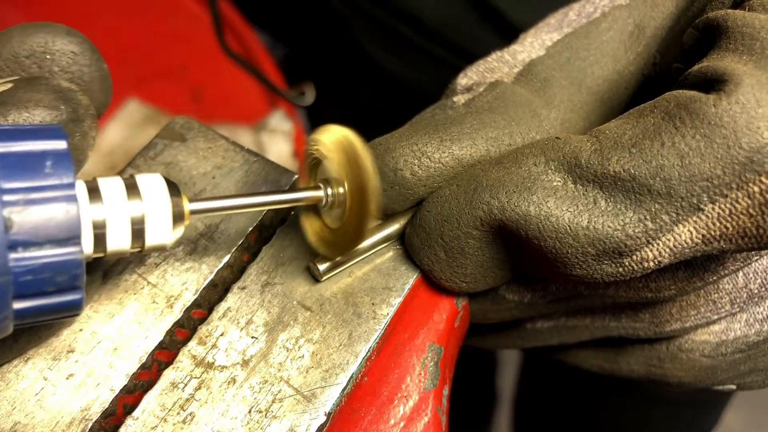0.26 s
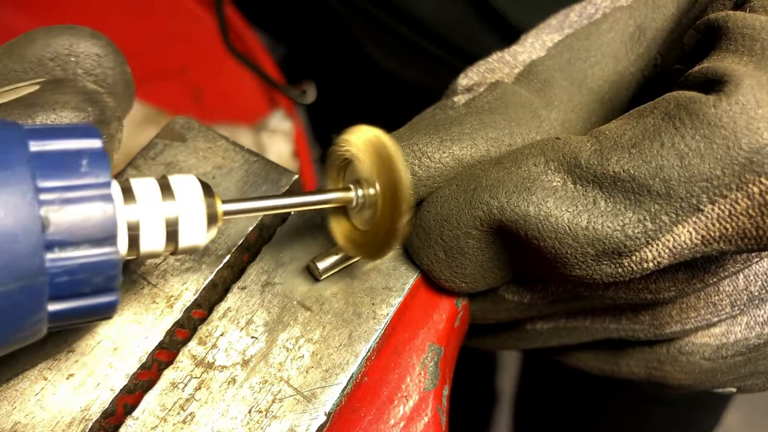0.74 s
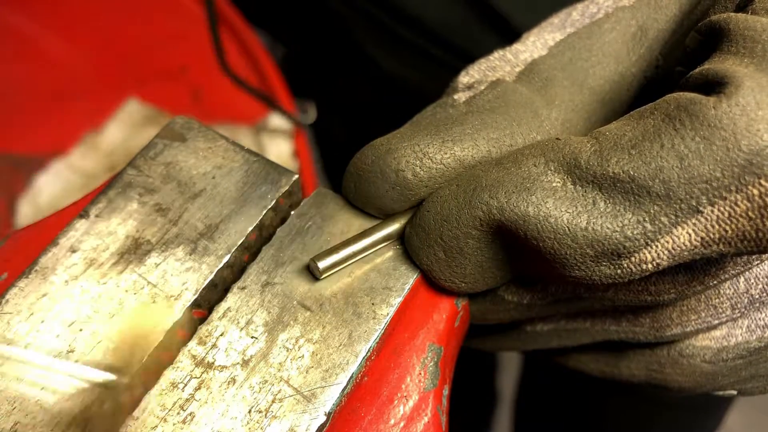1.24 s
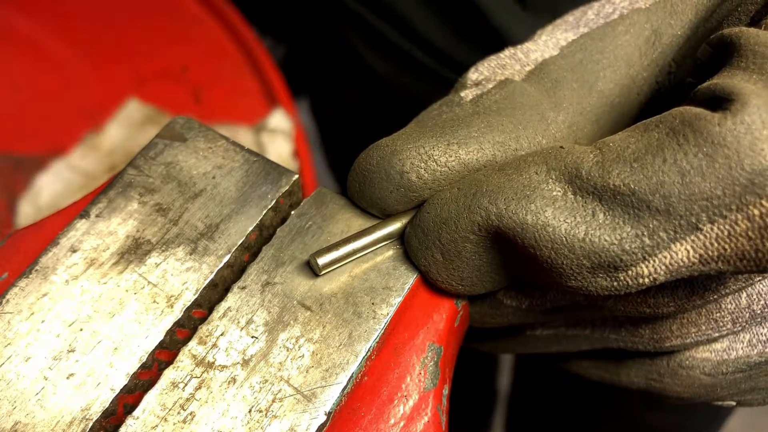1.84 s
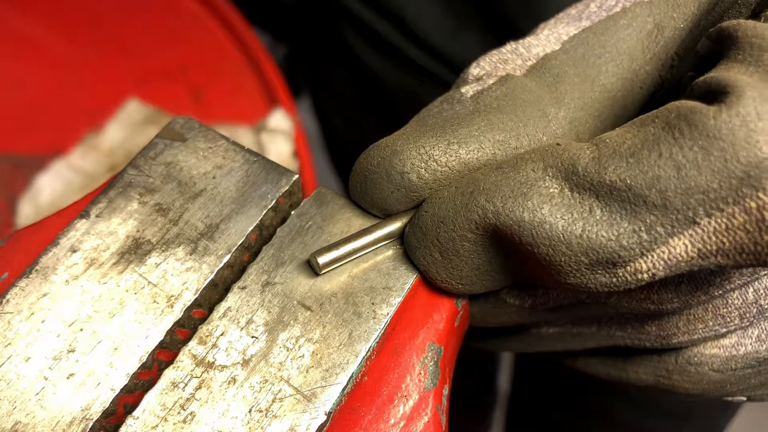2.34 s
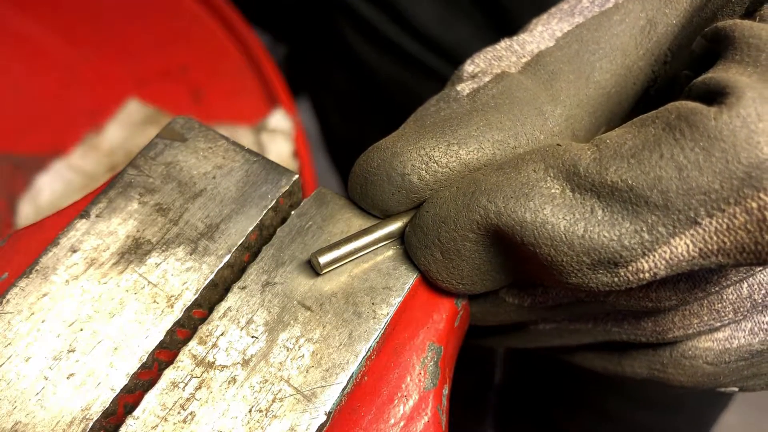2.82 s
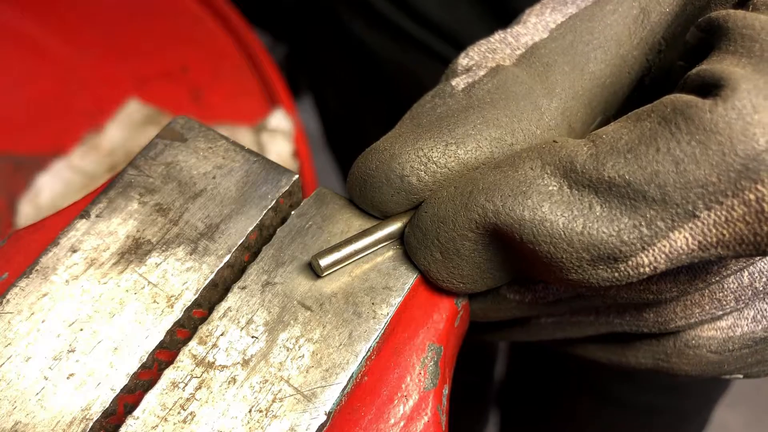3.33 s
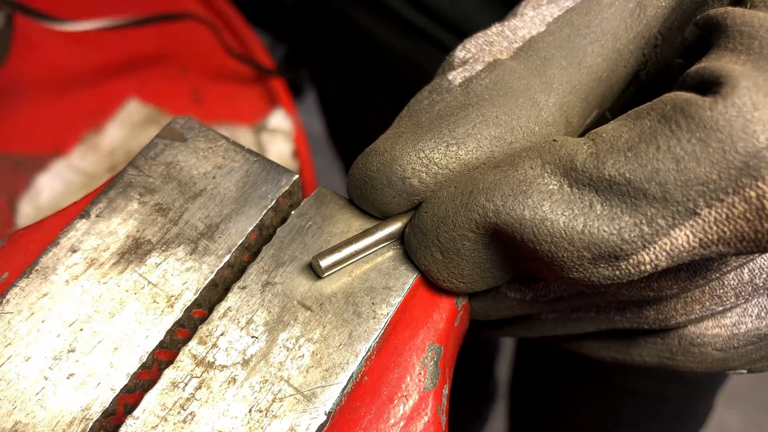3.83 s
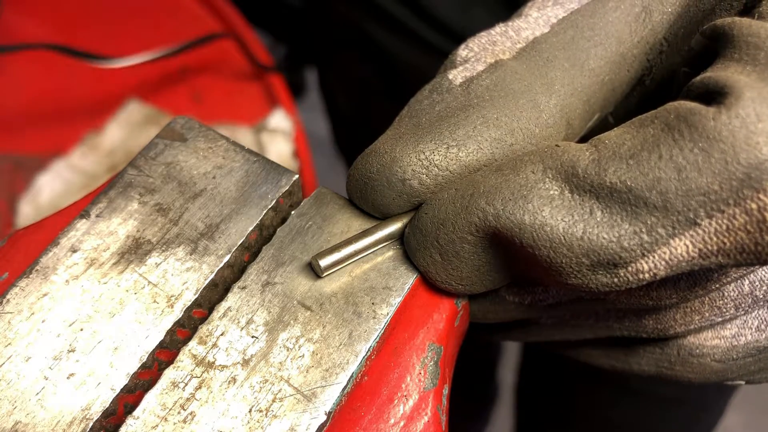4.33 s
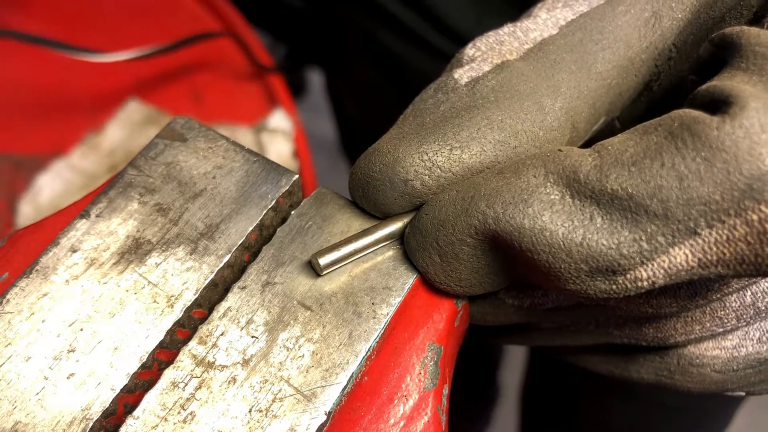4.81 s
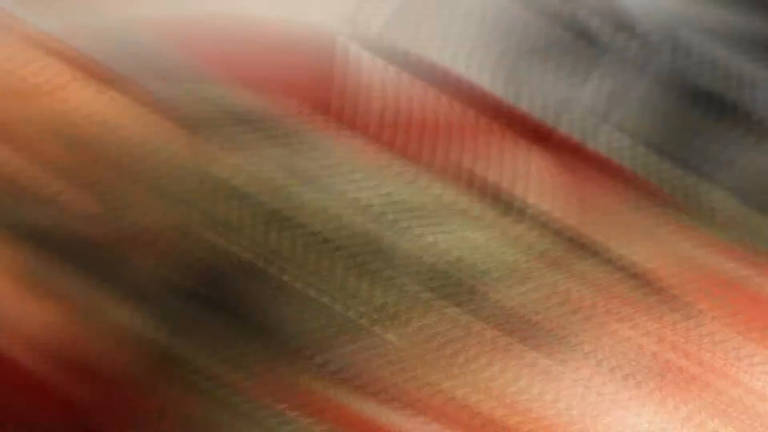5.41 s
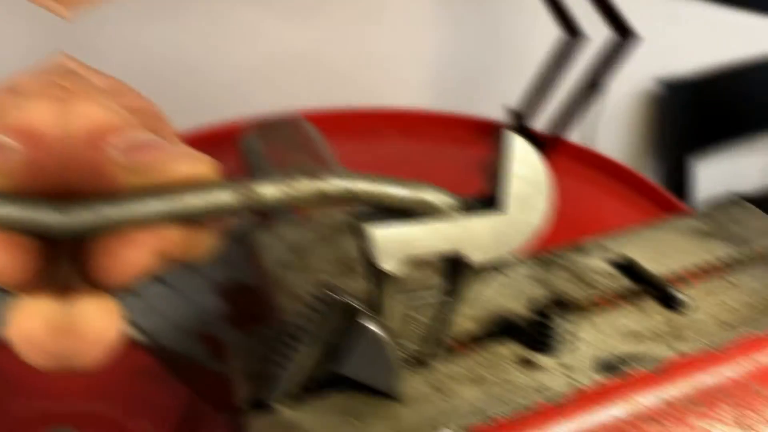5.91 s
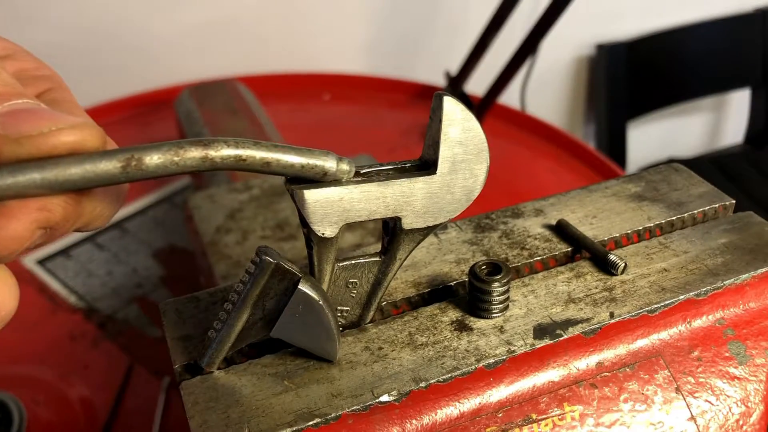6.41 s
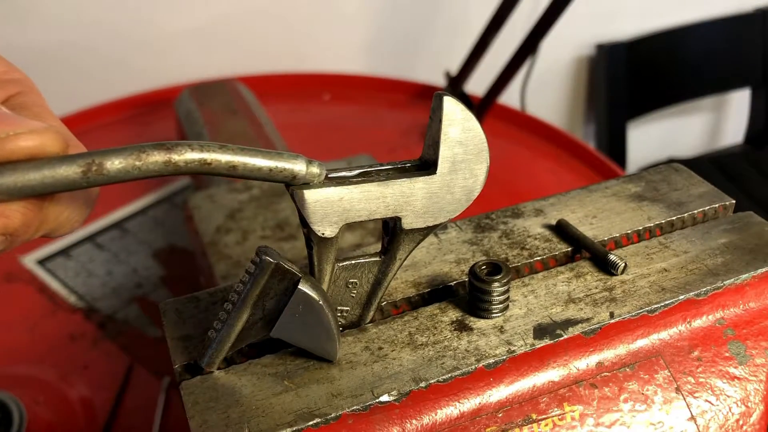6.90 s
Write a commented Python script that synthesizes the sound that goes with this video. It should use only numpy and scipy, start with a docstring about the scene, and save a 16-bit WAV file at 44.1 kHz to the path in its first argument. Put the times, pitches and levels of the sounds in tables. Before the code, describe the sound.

In a small workshop, close to the microphone, a handheld rotary tool buzzes with a rough, chattering rattle as its wire wheel brushes a steel pin. It lifts off, speeds up and hisses freely, then clicks off and winds down quickly. A hard metallic clank follows as it is laid down. Gloves rub softly and small parts click brightly, then light dry ticks sound over a faint room hum.

```python
"""A rotary tool buzzes and rattles as its wire brush works a steel pin; it lifts off, runs free and coasts down.
The housing rings with knocks from the turning shaft, under a whine, a hum and airy hiss; it is laid down with a clank.
Gloves and small parts rustle and click close by, made of patchy noise and short ringing modes.
Then light ticks sound at another bench, over a workshop hum and hiss of coloured noise."""
import sys
import numpy as np
from scipy import signal
from scipy.fft import rfft, irfft, next_fast_len
from scipy.io import wavfile
from scipy.ndimage import uniform_filter1d, map_coordinates

SR = 44100
rng = np.random.default_rng(int(sys.argv[2]) if len(sys.argv) > 2 else 0)


def log_audio(samples):
    """Write samples as a 16-bit WAV file to the path given in sys.argv[1]."""
    # one column per channel
    frames = np.atleast_2d(samples).T
    # limit to full scale, then quantise
    limited = np.clip(frames, -1, 1)
    pcm = np.round(limited * 32767).astype(np.int16)
    wavfile.write(sys.argv[1], SR, pcm)


N = 315315
T = np.arange(N) / SR

LIFT_OFF, SWITCH_OFF = 1.24, 3.165  # s
UNEVEN_ENDS = 1.17  # s, the wheel stops catching the pin

# colour of the housing: (frequency [Hz], density [dB per Hz])
HOUSING = [(150, -30), (400, -17.5), (600, -11.5), (800, 1), (1200, 2), (2000, -4.5), (2600, -9.5),
           (3200, -16.5), (4500, -25), (7000, -44.5)]
# colour of hiss, for the wires on the pin and the workshop: (frequency [Hz], density [dB per Hz])
HISS = [(590, -36), (1000, -7.5), (1040, -14.5), (2000, -5), (2380, -9), (3360, -10), (4980, -11.5),
        (9180, -13.5), (15800, -19)]
# brightness of a hard blow: (frequency [Hz], density [dB per Hz])
SHOCK = [(1500, -24), (2600, -11), (3900, 1), (5000, -7), (6300, -3), (9000, -13), (15800, -25)]
# modes of a handled part's body, also of the housing: (frequency [Hz], relative level [dB], t60 [s])
BODY = [(813, -13, 0.04), (1070, 7.5, 0.021), (1310, 3, 0.013), (1340, 14.5, 0.0091), (1990, -3.5, 0.017),
        (2370, 3.5, 0.018)]
# middle modes of small parts: (frequency [Hz], relative level [dB], t60 [s])
PARTS = [(2300, -3, .005), (3200, -2, .004), (4100, -1, .004), (5200, -2, .005)]
# bright steel modes: (frequency [Hz], relative level [dB], t60 [s])
STEEL = [(6270, -5.5, 0.012), (7070, 8.5, 0.013), (8110, 4.5, 0.0091), (10240, 4.5, 0.011),
         (12700, -11, 0.0045), (15000, 0.5, 0.0053)]
# strokes of gloves and parts rubbing:
# (start [s], end [s], low level [dB], high level [dB], swell from start to end [dB])
RUB = [(3.755, 3.815, -64, -77, 0), (4.199, 4.265, -73, -75, 3), (4.247, 4.483, -84, -94, -13),
       (4.489, 4.64, -85, -77, 12), (4.642, 4.891, -81.5, -82.5, 11), (4.956, 5.058, -77.5, -75, 4),
       (5.044, 5.139, -63.5, -71, -7), (5.128, 5.218, -65.5, -77, 10), (5.188, 5.323, -60, -65, 5),
       (5.297, 5.37, -66.5, -75, -1)]


def amp(db):
    """Decibels to gain."""
    return 10 ** (np.asarray(db) / 20)


def unit(x):
    """x at rms 1."""
    return x / np.sqrt(np.mean(x ** 2) + 1e-20)


def even(x):
    """x held near rms 1 over about 50 ms."""
    power = uniform_filter1d(uniform_filter1d(x ** 2, size=SR // 20), size=SR // 20)
    return x / np.sqrt(np.abs(power) + 1e-12)


def noise():
    """White noise of rms about 1."""
    return rng.standard_normal(N)


def along(points, hz):
    """(frequency, value) points read on a log frequency axis."""
    f, v = np.transpose(points)
    return np.interp(np.log(hz + 1), np.log(f + 1), v)


def curves(rows):
    """One value per sample for each column after the time."""
    s, *cols = np.transpose(rows)
    return [np.interp(T, s, c) for c in cols]


def during(start, end, fade):
    """1 between two times, with ramps of fade seconds just inside them."""
    return np.clip(np.minimum(T - start, end - T) / fade, 0, 1)


def stage(levels):
    """First value while brushing, second after lift-off."""
    return levels[0] + (levels[1] - levels[0]) * during(LIFT_OFF, 8, 0.19)


def wobble(rate):
    """A smooth random curve with rate knots a second."""
    return map_coordinates(rng.standard_normal(int(N * rate / SR) + 4), [T * rate])


def filtered(x, response):
    """x times a response of frequency."""
    m = next_fast_len(N + SR // 4)
    return irfft(rfft(x, m) * response(np.fft.rfftfreq(m, 1 / SR)), m)[:N]


def coloured(x, spectrum):
    """x through a (frequency, dB) spectrum, at rms 1."""
    return unit(filtered(x, lambda hz: amp(along(spectrum, hz))))


def resonant(x, peaks):
    """x through parallel resonances of alternating sign, at rms 1."""
    def response(f):
        return sum((-1) ** k * amp(db) * 1j * f * width / (hz * hz - f * f + 1j * f * width)
                   for k, (hz, width, db) in enumerate(peaks))
    return unit(filtered(x, response))


def patchy(x, db, size):
    """x with random patches of gain, about 500 Hz by size steps of 3 ms."""
    z = signal.stft(x, nperseg=256)[2]
    field = uniform_filter1d(rng.standard_normal(z.shape), size=3, axis=0)
    field = uniform_filter1d(field, size=size, axis=1)
    return signal.istft(z * amp(db * unit(field)), nperseg=256)[1][:N]


def ring(modes, crack, spread=.045):
    """One blow of peak 1: decaying modes at new strengths and pitches, plus a short bright crack."""
    t = np.arange(SR // 3) / SR
    x = sum(amp(db + rng.normal(0, 3) - 60 * t / t60) * np.sin(2 * np.pi * hz * rng.normal(1, spread) * t)
            for hz, db, t60 in modes)
    x = x + crack * amp(-60 * t / 0.017) * np.diff(rng.standard_normal(len(t) + 1))
    x = x * (1 - np.exp(-t / 0.00074))  # soft attack
    return x / np.abs(x).max()


def burst(seconds, t60):
    """White noise dying away exponentially."""
    t = np.arange(int(SR * seconds)) / SR
    return amp(-60 * t / t60) * rng.standard_normal(len(t))


def add(track, s, x):
    """Mix x into the track at s seconds."""
    track[round(s * SR):][:len(x)] += x


def shaft():
    """Turns per second: driven, then slowed by air drag and bearing friction."""
    drag_s, friction = 1.23, 170  # drag time constant in s; friction in turns per s
    # shaft speed under power: (time [s], speed [turns per s])
    powered = [(0, 208), (.08, 214), (.34, 214.3), (.47, 208), (.62, 210.5), (.76, 198), (.9, 210.4),
               (1.09, 201), (1.16, 203.5), (1.41, 240), (1.52, 246.2), (1.9, 251), (2.4, 253),
               (2.51, 249.5), (2.6, 252), (2.8, 249.5), (2.94, 250.6), (3.16, 247)]
    driven, = curves(powered)
    return (driven + friction) * np.exp(-np.clip(T - SWITCH_OFF, 0, None) / drag_s) - friction


def housing(speed, turn, pulsing, uneven):
    """The shaft knocks the housing once a turn; loose bearings turn the knocks into chatter."""
    steady_play = (.18, .33)  # bearing looseness 0-1: (brushing, running free)
    smear_tight, smear_loose, smear_brushing = .2, 1.6, .7  # radians
    slide_octaves = .3
    split_hz = (1100, 1650)  # borders of the lower and upper part
    # loudness of the housing as it is moved about:
    # (time [s], level [dB], lower part over it [dB], upper part over it [dB])
    rattle_rows = [(0.0, -40, 2, -5), (0.03, -39, -6.5, -10.5), (0.13, -44.5, 0, -1),
                   (0.47, -46.5, 3.5, 1.5), (0.71, -44, 2.5, 1.5), (0.87, -47, 7, 3),
                   (1.04, -39.5, 0.5, -2), (1.1, -43.5, 7.5, -1), (1.2, -35.5, -10, -9.5),
                   (1.243, -35, -6.5, -7.5), (1.251, -50, -4.5, 2.5), (1.265, -39, -4, -9.5),
                   (1.32, -36.5, -6.5, -1.5), (1.35, -43.5, 1.5, -2.5), (1.45, -37.5, -3, 4.5),
                   (1.5, -45, 8, 8), (1.54, -43, 3.5, 7.5), (1.77, -50, 0, 6), (1.82, -47, 2, -2),
                   (1.89, -50.5, -10.5, 2), (2.03, -55, 13, 12.5), (2.07, -50, 1, 4.5), (2.37, -52, 2, 9),
                   (2.4, -50.5, 4.5, 4), (2.45, -47.5, 3.5, 10.5), (2.5, -40.5, -1, -1),
                   (2.72, -40, -6, -0.5), (2.74, -59, 4, 18.5), (2.8, -43.5, -2, -2), (2.89, -44, -8, 3.5),
                   (2.96, -40, -3, 0), (3.05, -53, -5, 9.5), (3.26, -45, -6, 9.5),
                   (3.28, -41.5, -13.5, -2.5), (3.35, -45.5, -1.5, -1.5), (3.39, -45, -10.5, -9),
                   (3.44, -66.5, 7.5, 5), (3.76, -76, 12, 12), (3.83, -65.5, -0.5, 2.5)]
    # bouts of bearing chatter: (middle [s], half length [s], change of looseness [0-1])
    bouts = [(0.15, .42, .42), (1.2, .07, -.3), (1.35, .11, .3), (1.51, .11, -.22), (1.95, .25, .3),
             (2.28, .12, -.1), (2.61, .2, .45), (2.93, .09, .4), (3.1, .08, .12), (3.2, .04, .12),
             (3.27, .03, -.08), (3.34, .08, .3), (3.44, .04, -.1), (3.72, .3, .4)]
    # a ring slides down as coasting begins: (time [s], frequency [Hz], boost [dB])
    slide_rows = [(3.17, 2420, 1), (3.2, 2450, 7.5), (3.26, 1750, 6), (3.3, 1380, 8), (3.33, 1340, 3.5)]
    rattle_db, lower_db, upper_db = curves(rattle_rows)
    slide_hz, slide_db = curves(slide_rows)
    bout_play = sum(more * during(s - half, s + half, half) for s, half, more in bouts)
    loose = np.clip(stage(steady_play) + bout_play, 0, 1)
    # the housing spreads each knock, more so as the bearings loosen or the wires drag
    smear = smear_tight + smear_loose * loose + smear_brushing * during(-1, UNEVEN_ENDS, .03)
    # play in the bearings shifts each knock in time, which blurs the high orders most
    contact = turn + .19 * loose * wobble(110)

    def order(k):
        level_db = 2.6 * wobble(18) + 2.3 * wobble(6) - 1.3 * max(k - 9, 0)
        return amp(level_db) * np.sin(k * contact + smear * wobble(8))

    def slide(k):
        return amp(slide_db * np.exp(-(np.log2(k * speed / slide_hz) / slide_octaves) ** 2))

    knocks = sum(slide(k) * order(k) for k in range(3, 20))
    # strong and weak turns alternate: lines halfway between the orders
    between = sum(order(k + .5) for k in range(2, 20))
    steady = coloured(amp(0.84 * wobble(90)) * (knocks + uneven * between), HOUSING)
    once_a_turn = np.exp(.85 * pulsing * np.cos(contact + .4 * wobble(20)))
    chatter = patchy(once_a_turn * amp(1.3 * wobble(70)) * noise(), db=3.5, size=20)
    rattle = np.cos(loose * np.pi / 2) * steady + np.sin(loose * np.pi / 2) * coloured(chatter, HOUSING)
    below, under = [filtered(rattle, lambda hz: 1 / (1 + (hz / edge) ** 12)) for edge in split_hz]
    parts = amp(lower_db) * even(below) + even(under - below) + amp(upper_db) * even(rattle - under)
    return amp(rattle_db) * parts


def whine(turn):
    """Commutator bars sing at four and eight times the shaft speed."""
    # fourth-order whine, ahead of a 7 dB cut: (time [s], level [dB])
    fourth = [(0, -62), (.3, -47), (.52, -36), (.7, -33.5), (.78, -37.5), (1.04, -36.5), (1.2, -68),
              (1.44, -48), (1.7, -54), (1.93, -74), (2.04, -49), (2.42, -43), (2.51, -47), (2.69, -68),
              (2.77, -80.5), (2.95, -42.5), (3.04, -89), (3.29, -76), (3.4, -48.5), (3.5, -69), (3.83, -66)]
    # eighth-order whine: (time [s], level [dB])
    eighth = [(.44, -71), (.5, -48), (.64, -48), (.78, -58), (.9, -52), (1.0, -64), (1.36, -57),
              (1.45, -38), (1.65, -70), (2.1, -55), (2.2, -46), (2.4, -54.5), (2.5, -66), (3.3, -61),
              (3.5, -65), (3.83, -72)]
    fourth_db = curves(fourth)[0] + 1.2 * wobble(18) - 7
    eighth_db = curves(eighth)[0] + 2.5 * wobble(18)
    return amp(fourth_db) * np.sin(4 * turn) + amp(eighth_db) * np.sin(8 * turn)


def air(turn, pulsing):
    """Fan air and wire tips hiss in bursts once a turn; two steel rings drift and flare in the hiss."""
    ring_knots, flare_db = (650, 440), (2.5, 4)  # (lower, upper): bandwidth in knots per s, flare depth
    # air hiss, ahead of a 4.5 dB cut: (time [s], level [dB])
    hiss_rows = [(0.0, -44.5), (0.16, -47.5), (0.72, -46), (0.77, -53.5), (0.99, -48.5), (1.22, -46),
                 (1.33, -39), (1.36, -48), (1.41, -37.5), (1.47, -47), (1.49, -38), (1.55, -47),
                 (1.58, -39), (1.6, -45), (1.89, -48.5), (1.95, -52.5), (2.08, -48.5), (2.46, -52),
                 (2.54, -43), (2.57, -52.5), (2.69, -47), (2.71, -59), (2.74, -48), (2.87, -52.5),
                 (3.04, -46.5), (3.16, -42.5), (3.17, -50), (3.21, -47.5), (3.38, -58.5), (3.83, -66.5)]
    # hiss resonances while brushing: (frequency [Hz], width [Hz], relative level [dB])
    brushing = [(3535, 870, -5), (5430, 590, -1.5), (7370, 490, 1), (9580, 4800, -8.5), (12600, 2200, -2.5),
                (15700, 960, -11)]
    # hiss resonances while running free: (frequency [Hz], width [Hz], relative level [dB])
    running_free = [(3770, 430, -1), (5460, 2300, 1.5), (6820, 2730, 2), (9750, 1600, -1.5),
                    (13100, 3300, -8), (15800, 780, -12.5)]
    # two steel rings in the hiss:
    # (time [s], lower level [dB], upper level [dB], lower frequency [Hz], upper frequency [Hz])
    ring_rows = [(0.0, -59, -49.5, 5940, 11000), (0.06, -59, -53, 6070, 10900),
                 (1.19, -64, -70.5, 6170, 11100), (1.34, -49, -60.5, 6470, 10960),
                 (1.43, -48, -47.5, 6310, 10870), (1.64, -50.5, -57, 6480, 11130),
                 (1.89, -63, -51, 6210, 11000), (1.92, -67, -62, 6240, 11200),
                 (2.84, -59.5, -62.5, 6260, 10900), (3.1, -67, -62, 6240, 10940),
                 (3.15, -64, -52, 6160, 10860), (3.3, -86, -74, 6350, 11100), (3.83, -88, -95, 6530, 11100)]
    broad_db, = curves(hiss_rows)
    lower_db, upper_db, lower_hz, upper_hz = curves(ring_rows)
    once_a_turn = np.exp(.55 * pulsing * np.cos(turn + .6 * wobble(20)))
    free = during(LIFT_OFF, 8, 0.047)
    broad = patchy(once_a_turn * amp(1.4 * wobble(60)) * noise(), db=2.0, size=30)
    x = amp(broad_db - 4.5) * ((1 - free) * resonant(broad, brushing) + free * resonant(broad, running_free))
    for db, hz, knots, depth_db in zip((lower_db, upper_db), (lower_hz, upper_hz), ring_knots, flare_db):
        phase = 2 * np.pi * np.cumsum(hz) / SR
        narrow = unit(once_a_turn * (wobble(knots) * np.sin(phase) + wobble(knots) * np.cos(phase)))
        x = x + amp(db) * unit(amp(depth_db * wobble(33.85))) * narrow
    return x


def motor_hum(speed, turn, uneven):
    """Once- and twice-a-turn hum; it fades as the tool is drawn away and sinks as the shaft slows."""
    level_db = stage((-45.5, -46.5))  # (brushing, running free)
    fade_db_per_s = 5  # as the tool is drawn away after lift-off
    off_db, fall_db, free_speed = -2, 34, 250  # step at switch-off; loss per halving below free_speed, turns per s
    half_order_db = -18  # line halfway between first and second order, scaled by the unevenness
    off, halvings = during(SWITCH_OFF - .03, 8, 0.049), np.log2(free_speed / speed)
    drawn_away_db = fade_db_per_s * np.clip(T - LIFT_OFF, 0, None)
    hum_db = level_db - drawn_away_db + 0.88 * wobble(8.2) + off * (off_db - fall_db * halvings)
    second = amp(-7.5 + 4.7 * wobble(12)) * np.sin(2 * turn)
    halfway = uneven * amp(half_order_db + 10.0 * wobble(20.0)) * np.sin(3 * turn / 2)
    return amp(hum_db) * (np.sin(turn) + second + halfway)


def pin_shake():
    """The wires shake the pin and vise while they touch: noise in two low resonances."""
    shaking = resonant(noise(), [(82, 20, 0.54), (360, 82, -0.5)])
    return during(-1, LIFT_OFF, 0.028) * amp(-69 + 3 * wobble(29)) * shaking


def scratch():
    """Wires scratching the pin: coloured noise until lift-off."""
    return during(-1, LIFT_OFF, 0.17) * amp(-50.5) * coloured(noise(), HISS)


def tool():
    """One turning shaft drives rattle, whine, hiss and hum; returns the motor and the low sounds apart."""
    uneven_free, uneven_per_load, uneven_from = .06, 7, 217  # growth with fractional speed lost below turns per s
    smooth_below = 170  # turns per s: below this the chatter and hiss pulse ever less
    speed = np.clip(shaft(), 1, None)
    turn = 2 * np.pi * np.cumsum(speed) / SR
    pulsing = np.clip(speed / smooth_below, 0, 1) ** 3
    load = np.clip(1 - speed / uneven_from, 0, 1)
    uneven = uneven_free + during(-1, UNEVEN_ENDS, 0.018) * uneven_per_load * load
    motor = housing(speed, turn, pulsing, uneven) + whine(turn) + scratch() + air(turn, pulsing)
    hum = during(-1, 4.9, 0.062) * motor_hum(speed, turn, uneven)
    return during(-1, 3.9, 0.035) * motor, hum + pin_shake()


def shop():
    """Workshop hum and hiss of coloured noise, rising from the first bench to the other."""
    move = [5.1, 6.2]  # s, from one bench to the other
    # colour of the workshop hum: (frequency [Hz], density [dB per Hz])
    hum_colour = [(15, -36.5), (25, 3.5), (75, 1), (220, -3.5), (253, 0), (377, -3), (426, -7.5),
                  (706, -12), (917, -15), (1050, -16), (1600, -23), (2080, -44), (3520, -120)]
    hum_db = np.interp(T, move, (-73.5, -66))
    hiss_db = np.interp(T, move, (-84.5, -77.5))
    swell_db = 1.2 * wobble(7)
    return amp(hum_db + swell_db) * coloured(noise(), hum_colour) + amp(hiss_db) * coloured(noise(), HISS)


def switch():
    """The click of the switch: bright steel modes and a strong crack."""
    x = np.zeros(N + SR)
    add(x, SWITCH_OFF - .015, amp(-39) * ring(STEEL[2:], crack=1.5))
    return x[:N]


def narrow_bands():
    """Noise through sharp resonances: a ring of the coasting tool, then faint workshop whistles."""
    # a ring of the coasting tool (first row), then workshop whistles:
    # (start [s], end [s], frequency [Hz], width [Hz], level [dB])
    bands = [(3.53, 3.7, 2450, 260, -69), (5.85, 6.06, 8120, 60, -93), (5.98, 6.6, 9800, 70, -95),
             (5.85, 6.5, 10200, 900, -89), (5.9, 6.9, 2240, 120, -91)]
    x = np.zeros(N)
    for start, end, hz, width, db in bands:
        peak = [(hz, width, 0)]
        band = resonant(resonant(noise(), peak), peak)
        x = x + during(start, end, 0.035) * amp(db + 4.9 * wobble(23)) * band
    return x


def rubbing():
    """Dense slips of uneven size under each stroke; the loudness wavers with the grip."""
    # colours of the low and the high rub: (frequency [Hz], density [dB per Hz])
    low_colour = [(410, -38), (700, -10), (1220, 0), (1590, -4), (2030, 1), (2730, -10), (3300, -12),
                  (3800, -4.5), (4300, -10), (4800, -30), (7000, -60)]
    high_colour = [(2470, -34), (4200, -4), (4820, -4), (5630, 1.5), (6440, -14), (7310, -1), (9440, -10.5),
                   (15800, -7.5)]
    grip_db = 1.2 * wobble(40)
    slips = patchy(amp(3.0 * wobble(400) + grip_db) * noise(), db=3.0, size=12)
    low, high = coloured(slips, low_colour), coloured(slips, high_colour)
    x = np.zeros(N)
    for start, end, low_db, high_db, swell_db in RUB:
        swell = amp(swell_db * (np.clip((T - start) / (end - start), 0, 1) - .5))
        x = x + during(start, end, 0.026) * swell * (amp(low_db) * low + amp(high_db) * high)
    return x


def clicks():
    """Small contacts: each shares its blow between steel, parts and body; some parts knock on the bench."""
    middle_over_db, middle_per_heft = 1, 0.8  # the parts' ring over the treble, and how it grows with heft
    faint_per_s, faint_db, faint_spread_db, faint_heft_db = 18, -61, 6.5, -17.5  # scattered through the strokes
    # handling clicks, ahead of trims: (time [s], treble level [dB], heft: bass over the treble [dB])
    handling = [(4.223, -49.5, -10), (4.2504, -45.5, -13), (4.301, -42, -6), (4.3173, -50, -3),
                (4.352, -52.5, -8), (4.4316, -53.5, -15), (4.4458, -51.5, -12), (4.5018, -42.5, -14.5),
                (4.5277, -42, -22), (4.546, -46, -10), (4.5777, -46, -23), (4.644, -29, -19),
                (4.6485, -30.5, -22), (4.676, -46, -20), (4.7018, -46, -21), (4.713, -50.5, -20),
                (4.7296, -41, -24), (4.786, -39.5, -18), (4.802, -50, -18), (4.858, -45.5, -22),
                (4.876, -60.5, -18), (4.884, -51.5, -15), (4.974, -54, -14), (4.992, -56, -14),
                (5.018, -46, -11), (5.039, -54, -8), (5.069, -41.5, -23), (5.092, -39.5, -10),
                (5.108, -51, -12), (5.14, -45, -15), (5.154, -54.5, -13), (5.2449, -42.5, -16),
                (5.2663, -48.5, -12), (5.324, -42, -14)]
    # short knocks of a part on the bench: (time [s], peak level [dB], pitch [Hz])
    knocks = [(4.3, -52, 1240), (4.6163, -37, 1170), (4.685, -50, 990), (4.974, -62, 2040),
              (5.1987, -36, 1480), (5.2663, -46, 1880)]
    # modes of a knock: (multiple of the pitch, relative level [dB], t60 [s])
    knock_modes = [(.65, -16, 0.02), (1, 2.5, 0.01), (1.12, -2, .012), (1.7, 0.5, .006), (2.6, -9, .005)]
    x = np.zeros(N + SR)
    faint = [(rng.uniform(start, end), rng.normal(faint_db, faint_spread_db), faint_heft_db)
             for start, end, *_ in RUB for _ in range(round((end - start) * faint_per_s))]
    for s, db, hz in knocks:
        add(x, s, amp(db) * ring([(k * hz, level, t60) for k, level, t60 in knock_modes], crack=.05))
    for s, db, heft_db in handling + faint:
        middle_db = middle_over_db + middle_per_heft * heft_db
        add(x, s, amp(db - 6.5) * ring(STEEL, crack=2.0))
        add(x, s, amp(db + middle_db) * ring(PARTS, crack=0.082))
        add(x, s, amp(db + heft_db - 2.0) * ring(BODY, crack=0))
    return x[:N]


def clank():
    """The housing cracks and rings at each bounce, the bench booms; also returns the cracks alone."""
    # the chuck touches down first: (time [s], peak level [dB])
    touches = [(3.851, -28), (3.892, -54.5)]
    # modes of the chuck: (frequency [Hz], relative level [dB], t60 [s])
    chuck = [(703, -1.5, 0.033), (1040, 6.5, 0.018), (1380, 8, 0.014), (1970, 9.5, 0.014),
             (3770, -8, 0.008), (6540, -10, .006)]
    # bounces of the tool laid down, ahead of trims: (time [s], level [dB], treble over it [dB])
    bounces = [(3.9144, -17.5, 0), (3.919, -16.5, -1.5), (3.9266, -26.5, -12), (3.933, -23, -4),
               (3.9454, -28, -21)]
    # dull bumps of the bench: (time [s], peak level [dB], upper mode over the lower [dB])
    bumps = [(3.93, -48.5, 7), (4.62, -63, -12), (4.686, -58.5, -12), (5.072, -66, -10), (5.2, -65, 9)]
    # the two modes of the bench: (frequency [Hz], t60 [s])
    bench = [(180, .25), (355, .22)]
    x, dull, sharp = np.zeros(N + SR), np.zeros(N + SR), np.zeros(N + SR)
    for s, db, treble_db in bounces:
        add(x, s, amp(db - 5.5) * ring(BODY, crack=0))
        add(dull, s, amp(db) * burst(.05, t60=0.012))
        add(sharp, s, amp(db + treble_db) * burst(.05, t60=0.015))
    for s, db in touches:
        add(x, s, amp(db) * ring(chuck, crack=0.2))
        add(sharp, s, amp(db + 1.5) * burst(.05, t60=0.012))
    for s, db, upper_db in bumps:
        modes = [(hz, level, t60) for (hz, t60), level in zip(bench, (0, upper_db))]
        add(x, s, amp(db) * ring(modes, crack=0, spread=.01))
    dull_cracks = filtered(dull[:N], lambda hz: amp(along(HOUSING, hz) + 6.0))
    sharp_cracks = filtered(sharp[:N], lambda hz: amp(along(SHOCK, hz) - 2.5))
    cracks = dull_cracks + sharp_cracks
    return x[:N] + cracks, cracks


def ticks():
    """Light dry ticks with a dull thud from the bench; harder ticks are brighter."""
    treble_db, treble_grows, usual_db = -13, 0.42, -53  # steel ring over a usual tick; dB more per dB harder
    # ticks at the other bench, ahead of trims: (time [s], level [dB], thud over it [dB])
    tick_rows = [(5.4101, -54, -2.5), (5.427, -57, -13), (5.463, -58, 0), (5.4905, -63, -8),
                 (5.5158, -50, 1), (5.547, -59, -10), (5.562, -52.5, 3.5), (5.5947, -61, -14),
                 (5.611, -58, -13), (5.635, -58, -3), (6.1377, -59, 1), (6.2318, -51, -5),
                 (6.335, -46, 2.5), (6.419, -55, -3), (6.499, -56.5, -18), (6.5316, -52, -8),
                 (6.6237, -52, -7), (6.736, -59, -18), (6.8249, -45, -0.5), (6.9693, -51.5, -3)]
    thud_modes = [(506, -5, 0.08), (627, 6.5, 0.018), (1160, 0.5, 0.0092)]  # (Hz, relative dB, t60 s)
    x, snap = np.zeros(N + SR), np.zeros(N + SR)
    for s, db, thud_db in tick_rows:
        steel_db = db + treble_db + treble_grows * (db - usual_db)
        add(x, s, amp(db + thud_db - 4.5) * ring(thud_modes, crack=0))
        add(x, s, amp(db - 6.0) * ring(PARTS, crack=0))
        add(x, s, amp(steel_db) * ring(STEEL[2:], crack=1.6))
        add(snap, s, amp(db) * burst(.025, t60=0.023))
    return x[:N] + filtered(snap[:N], lambda hz: amp(along(SHOCK, hz) - 1.0))


def room(x):
    """A noise tail 5 ms behind the sound, each frequency dying at its own speed."""
    # decay of the room: (frequency [Hz], t60 [s])
    decay = [(200, 0.58), (1000, 0.87), (3000, 0.7), (8000, 0.35), (15000, 0.1)]
    hz, t, z = signal.stft(rng.standard_normal(SR), SR, nperseg=256)
    tail = signal.istft(z * amp(-60 * t / along(decay, hz)[:, None]), SR, nperseg=256)[1]
    return signal.fftconvolve(np.pad(x, (SR // 200, 0)), tail / np.linalg.norm(tail))[:N]


def scene():
    """Everything near the microphone, its echo from the room, and the workshop behind."""
    motor, hum = tool()
    blow, cracks = clank()
    small = switch() + clicks()
    # the cracks are sent to the room once more, on top of the whole blow
    echo = room(amp(-11.0) * motor) + room(amp(-23) * (blow + cracks)) + room(amp(-14.5) * small)
    return (motor + hum + shop() + small + narrow_bands() + rubbing() + blow + ticks() + echo)[None]


def record(dry):
    """The microphone rolls off in the deep bass and keeps nothing above its band limit."""
    top_hz, bass_hz = 15800, 36
    return filtered(dry[0], lambda hz: (hz < top_hz) * hz ** 4 / (hz ** 4 + bass_hz ** 4))[None]


dry = scene()
out = record(dry)
log_audio(out)
```